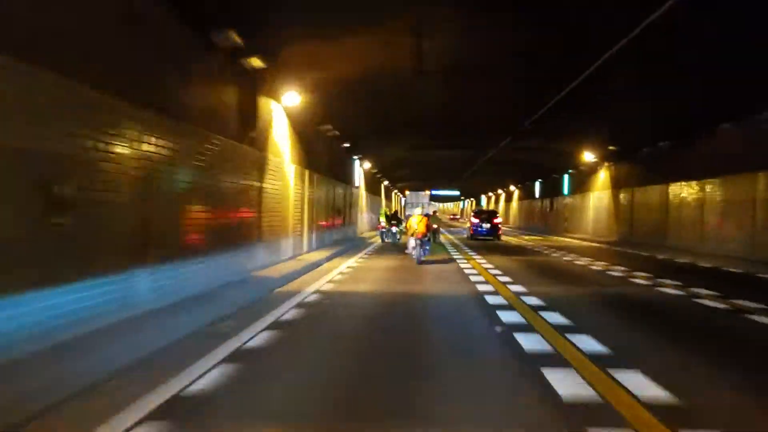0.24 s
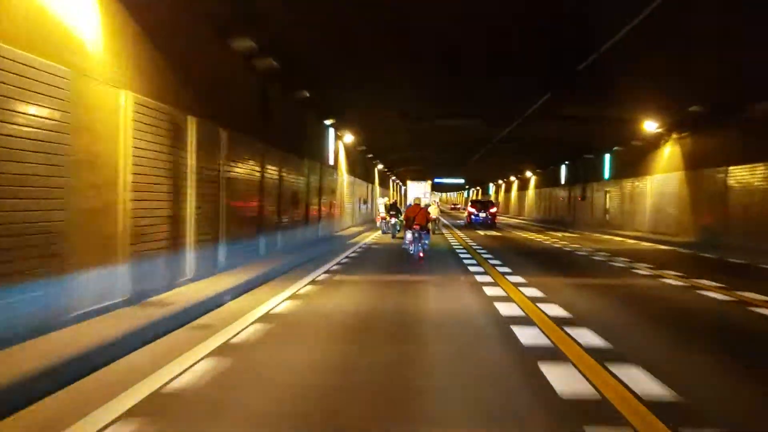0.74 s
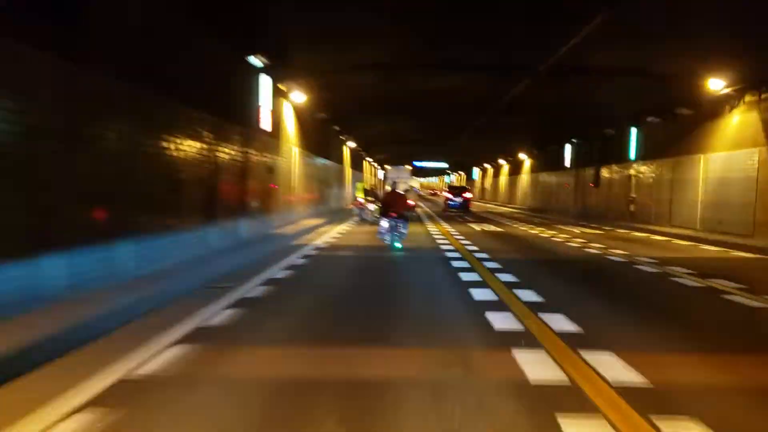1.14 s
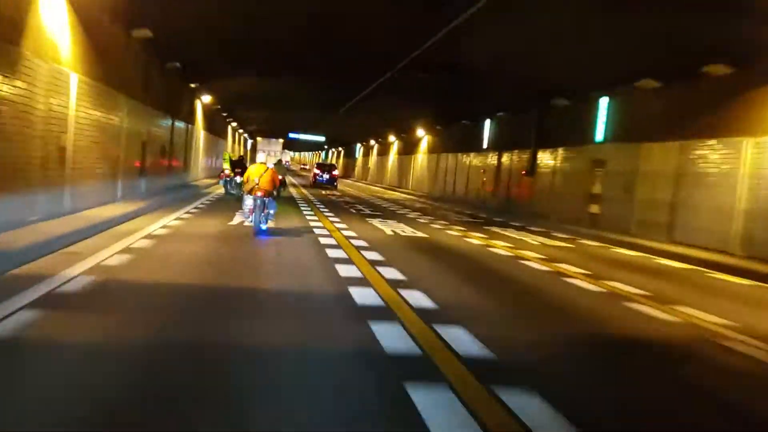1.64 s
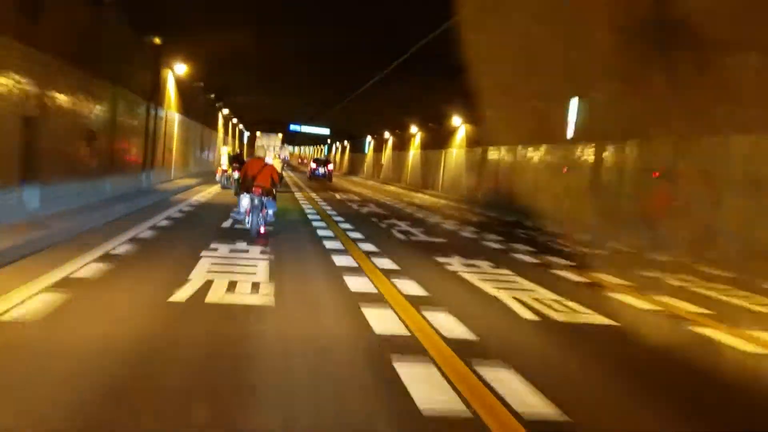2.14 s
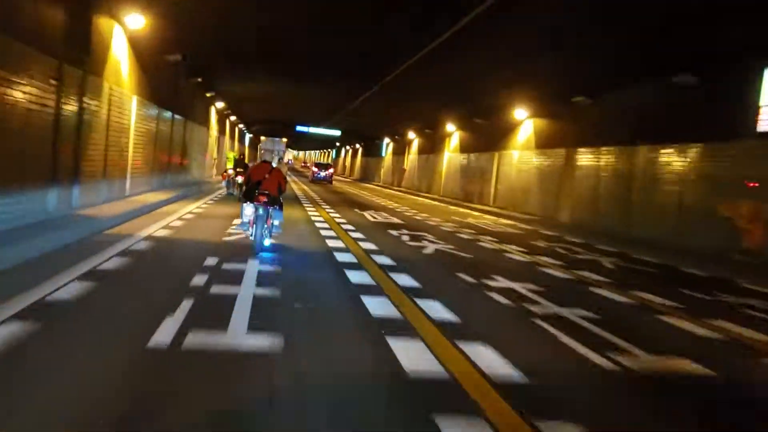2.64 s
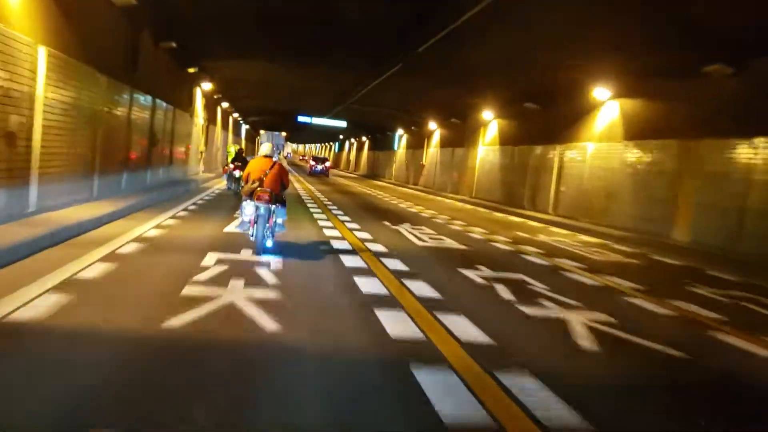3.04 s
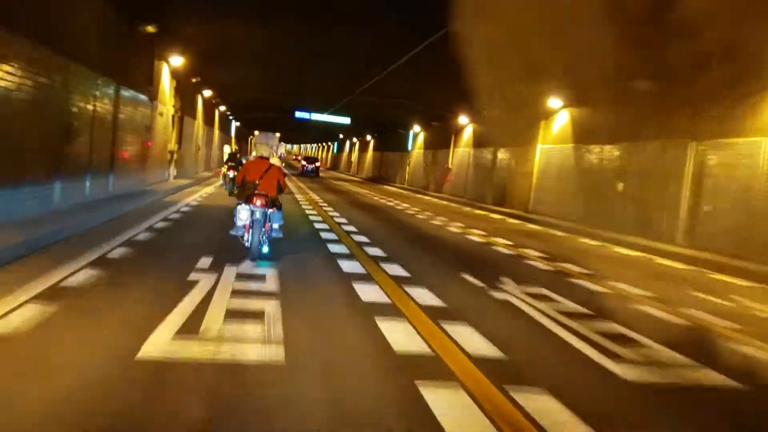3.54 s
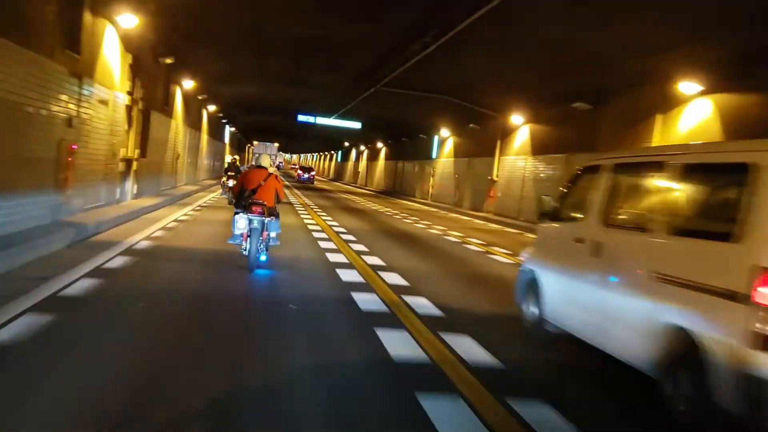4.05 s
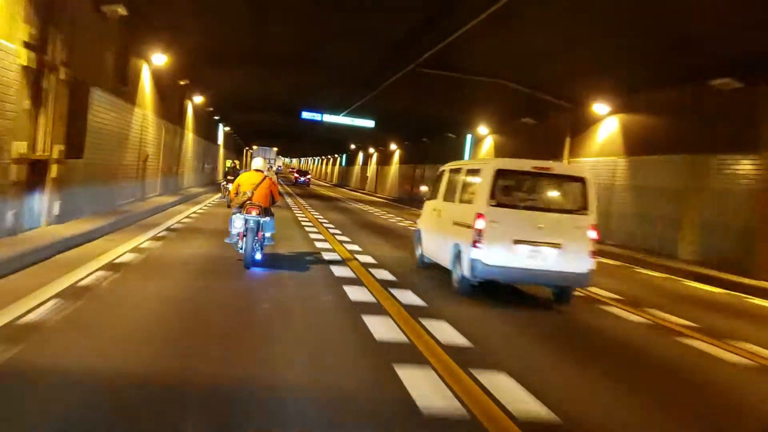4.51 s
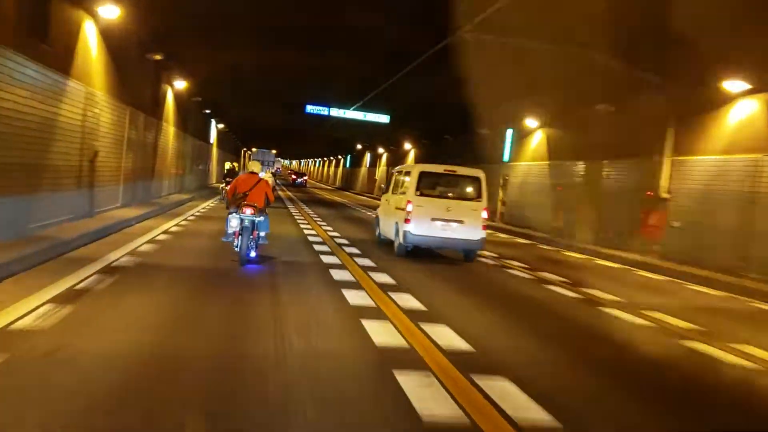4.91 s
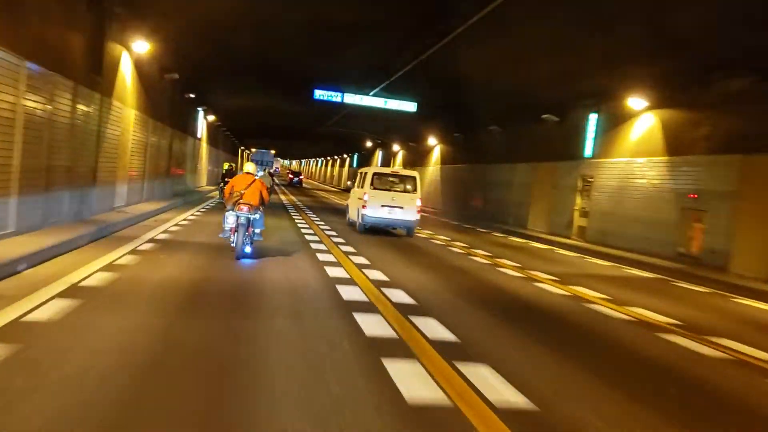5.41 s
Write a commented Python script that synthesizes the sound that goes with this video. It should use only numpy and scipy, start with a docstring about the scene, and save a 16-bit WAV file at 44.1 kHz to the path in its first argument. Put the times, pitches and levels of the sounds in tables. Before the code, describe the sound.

A microphone in a car cabin picks up bass-heavy boom, drumming tyres and a faint steady whine. Motorcycle exhausts drone from the start, come close near 1.3 seconds with a rush of noise and dry ticks, then fade by three seconds. A van draws alongside near four seconds, lower and rougher, with whine and gentle hiss, then moves ahead leaving a low drone in the tunnel.

```python
"""Car cabin in a road tunnel

Microphone inside a moving car: noise bands boom through the body, drum and roar from the tyres.
Two motorcycles drone and run close for a moment; then a van overtakes, each with a swell of hiss.
Engine notes are harmonics of a firing rate; beating and drifting tunnel echoes make them throb and waver.
Brief noise grains rustle and damped sines tick close by; the signal jumps once with a click."""
import sys
import numpy as np
from scipy.fft import rfft, irfft, next_fast_len
from scipy.io import wavfile
from scipy.ndimage import uniform_filter1d, map_coordinates

SR = 44100
rng = np.random.default_rng(int(sys.argv[2]) if len(sys.argv) > 2 else 0)


def dump_mix(stems):
    """Bounce the given channels to the path in sys.argv[1] as a 16-bit WAV at rate SR."""
    frames = np.atleast_2d(stems).T  # one column per channel
    limited = np.clip(frames, -1, 1)  # hard clip at full scale
    pcm = np.round(limited * 32767).astype(np.int16)
    wavfile.write(sys.argv[1], SR, pcm)


N = 250047
TIME = np.arange(N) / SR  # seconds


def amp(db):
    """Decibels to gain."""
    return 10 ** (np.asarray(db) / 20)


def unit(x):
    """Scaled to rms 1."""
    return x / np.sqrt(np.mean(x ** 2) + 1e-20)


def along(points, hz):
    """Values at hz, read from (frequency, value) points on a log axis."""
    point_hz, values = np.transpose(points)
    return np.interp(np.log(hz + 1), np.log(point_hz + 1), values)


def curves(rows):
    """One value per sample for each column after the time."""
    seconds, *columns = np.transpose(rows)
    return [np.interp(TIME, seconds, column) for column in columns]


def present(rows, fade):
    """1 while a table lasts, fading over some seconds outside it."""
    start, end = rows[0][0], rows[-1][0]
    return np.interp(TIME, [start - fade, start, end, end + fade], [0, 1, 1, 0])


def wobble(rate):
    """A smooth random curve, rate knots a second."""
    return map_coordinates(rng.standard_normal(512), [TIME * rate + 2], mode="wrap")


def filtered(x, response):
    """x shaped by a response of frequency, padded so that its end does not wrap round."""
    size = next_fast_len(N + 8192)
    spectrum = rfft(x, size) * response(np.fft.rfftfreq(size, 1 / SR))
    return irfft(spectrum, size)[..., :N]


def pan(db):
    """Left and right gains for a left-minus-right level in dB."""
    return amp([[db / 2], [-db / 2]])


# Likeness of the two ears in the cabin: (frequency [Hz], left-right correlation [-1 to 1])
EAR_LIKENESS = [(25, .998), (60, 0.95), (130, 0.99), (260, 0.82), (440, 0.86), (530, 0.23), (670, 0.54),
                (760, -0.7), (890, -0.56), (1200, -0.3), (1600, -0.17), (2200, 0.032), (4000, -0.011)]


def noise(spectrum):
    """Stereo noise of rms 1: alike in the bass, opposed near 800 Hz, diffuse in the treble."""
    def mid_side_response(hz):
        turn = np.arccos(np.clip(along(EAR_LIKENESS, hz), -1, 1)) / 2
        return amp(along(spectrum, hz)) * [np.cos(turn), np.sin(turn)]

    mid, side = filtered(rng.standard_normal((2, N)), mid_side_response)
    return unit(np.array([mid + side, mid - side]))


def even(x, seconds):
    """Noise whose power holds steady over spans longer than seconds."""
    size = max(int(seconds * SR / 2), 2)
    power = uniform_filter1d(uniform_filter1d(np.mean(x ** 2, axis=0), size), size)
    return x / np.sqrt(np.abs(power) + 1e-9)


def note(hz, echo, flutter, spread):
    """A tone of rms 1 with its tunnel echoes, which drift in size and phase, partly apart at each ear."""
    drift = lambda: wobble(flutter) + 1j * wobble(flutter)
    field = 1 + echo * drift() + spread * np.array([drift(), drift()])
    cycles = np.cumsum(hz) / SR + rng.random()
    return unit(np.real(field * np.exp(2j * np.pi * cycles)))


def throb(beat_hz, crest_s, depth):
    """Gain of a note beating against a Doppler-shifted echo from the tunnel walls."""
    return np.abs(1 + depth * np.exp(2j * np.pi * beat_hz * (TIME - crest_s)))


def nearness(s, approach, stay, leave):
    """0 far, 1 alongside: a vehicle draws up, stays a moment and recedes."""
    before, after = np.maximum(s - TIME, 0), np.maximum(TIME - s - stay, 0)
    return np.exp(-(before / approach) ** 2 / 2 - after / leave)


def swell(far_db, near_db, near):
    """Gain of a source heard faintly from afar and directly when near."""
    return np.hypot(amp(far_db), amp(near_db) * near)


# The road under the car: (time [s], body shake level [dB], tyre drum level [dB])
ROAD = [(0.0, -28.5, -25), (0.2, -26.5, -23.5), (0.61, -30.5, -26.5), (1.05, -23.5, -20),
        (1.26, -23.5, -24.5), (3.0, -28, -24), (3.12, -30.5, -23.5), (3.36, -23, -22.5),
        (3.97, -25.5, -22.5), (4.25, -27.5, -25.5), (4.82, -27.5, -24), (5.67, -28, -21.5)]
# Spectra of body shake, cabin air resonances, tyre drum and tyre roar:
# each (frequency [Hz], relative density [dB per Hz])
SHAKE_SPECTRUM = [(15, -32.5), (25, -10.5), (38, -6.5), (50, 0.5), (62, 6.5), (75, -3), (100, -14),
                  (200, -92.5), (600, -140)]
BOOM_SPECTRUM = [(45, -43.5), (70, -13.5), (86, 1), (105, -3.5), (120, -3), (135, 1.5), (152, -11.5),
                 (175, -4.5), (200, -10.5), (300, -52), (900, -140)]
DRUM_SPECTRUM = [(90, -33.5), (145, 2), (170, 3.5), (195, -1), (235, 2.5), (270, 4), (320, 1), (365, -6.5),
                 (430, -11.5), (800, -54), (2500, -140)]
ROAR_SPECTRUM = [(220, -51), (350, -2), (410, 1.5), (470, -3.5), (545, -0.5), (620, -13), (700, -12),
                 (820, -22.5), (1200, -35.5), (5000, -140)]
# The car's own drive train: (time [s], level [dB])
CAR_WHINE = [(0, -34), (.55, -36), (1.1, -28.5), (1.8, -27), (2.3, -38), (3.05, -30), (3.25, -37),
             (3.85, -24), (4.25, -34.5), (4.8, -36), (5.22, -26.5), (5.5, -29.5)]
BOOM_DB = -24
ROAR_FAR_DB, ROAR_NEAR_DB = -29, -31  # tyre roar alone, and what a vehicle alongside adds
WHINE_HZ, WHINE_OCTAVE_DB = 401.3, -27  # the octave's level is against the fundamental


def car(near):
    """The road shakes the body and booms in the cabin; the tyres drum, and roar louder beside vehicles."""
    shake_db, drum_db = curves(ROAD)
    shake = amp(shake_db) * even(noise(SHAKE_SPECTRUM), seconds=0.76)
    boom = amp(BOOM_DB) * even(noise(BOOM_SPECTRUM), seconds=0.18)
    drum = amp(drum_db) * even(noise(DRUM_SPECTRUM), seconds=0.17)
    roar = swell(ROAR_FAR_DB, ROAR_NEAR_DB, near) * even(noise(ROAR_SPECTRUM), seconds=0.14)
    hz = WHINE_HZ + np.zeros(N)
    whine = note(hz, echo=0.14, flutter=10, spread=0.45)
    whine = whine + amp(WHINE_OCTAVE_DB) * note(2 * hz, echo=0.23, flutter=11, spread=0.53)
    return shake + boom + bumps() + drum + roar + amp(curves(CAR_WHINE)[0]) * whine


# Engine speed before its wander: (time [s], firing rate [Hz])
BIKE_RATE = [(0, 105.5), (.4, 104.6), (.8, 104), (1.15, 105.6), (1.35, 104.4), (1.65, 105.4), (1.9, 103.6),
             (2.1, 104.2), (2.5, 99.5), (2.9, 99), (3.4, 105), (4, 104.5), (4.4, 108.5), (5.67, 108.5)]
# Firing note, before it throbs: (time [s], level [dB])
BIKE_THRUM = [(0, -16), (.07, -14.5), (.3, -17.5), (.46, -19), (.6, -39), (.8, -30), (1.05, -26.5),
              (1.22, -17), (1.36, -26.5), (1.52, -13.5), (1.7, -22), (1.88, -26.5), (2.02, -18.5),
              (2.17, -14.5), (2.4, -17.5), (2.6, -21.5), (3.05, -29), (3.38, -29.5), (3.58, -19),
              (3.9, -26.5), (4.4, -22.5), (4.9, -26), (5.67, -24.5)]
# Second harmonic: (time [s], level [dB])
BIKE_OCTAVE = [(0, -23), (.17, -21.5), (.41, -27.5), (.52, -20.5), (.75, -19.5), (1.05, -33), (1.23, -21),
               (1.5, -21.5), (1.6, -30), (1.73, -19.5), (1.85, -24.5), (2.05, -25.5), (2.3, -20.5),
               (2.6, -32), (2.9, -29)]
# Strong harmonics that beat with their wall echoes:
# (multiple of firing rate, relative level [dB], beat rate [Hz], crest time [s])
BIKE_GROWL = [(3, 1.5, 2.9, 1.65), (4, 1.5, 1.9, 1.603), (5, 0.5, 1.4, 1.3), (6, -5.5, 3.8, 1.566)]
# Upper notes; uneven cylinders add half multiples: (multiple of firing rate, relative level [dB])
BIKE_RASP = [(2.5, -5), (5.5, -17.5), (6.5, -15), (7, -17.5), (7.5, -17.5), (9, -23), (9.5, -22.5),
             (10, -19.5), (11, -27), (12.5, -22.5), (18, -22.5), (19, -28.5)]
BIKE_RASP_NEAR_DB = -29  # growl and rasp right alongside
BIKE_RASP_CARRIED_DB = -25  # growl and rasp from afar, against the firing note


def motorcycle(near):
    """Low exhaust notes carry through the tunnel and throb; growl and rasp stand out when it is close."""
    hz = curves(BIKE_RATE)[0] * (1 + 0.00596 * wobble(12))  # the engine speed wanders
    thrum_db, = curves(BIKE_THRUM)
    thrum = amp(thrum_db) * note(hz, echo=0.18, flutter=11, spread=0.1)
    thrum = thrum * throb(beat_hz=8.7, crest_s=2.96, depth=0.33)
    octave = amp(curves(BIKE_OCTAVE)[0]) * note(2 * hz, echo=0.2, flutter=16, spread=0.22)
    growl = sum(amp(db) * throb(beat_hz, crest_s, depth=0.54)
                * note(multiple * hz, echo=0.2, flutter=24, spread=0.11 * multiple)
                for multiple, db, beat_hz, crest_s in BIKE_GROWL)
    rasp = sum(amp(db) * note(multiple * hz, echo=0.48, flutter=22, spread=0.27 * multiple)
               for multiple, db in BIKE_RASP)
    upper = swell(thrum_db + BIKE_RASP_CARRIED_DB, BIKE_RASP_NEAR_DB, near) * (growl + rasp)
    return thrum + (octave + upper) * present(BIKE_OCTAVE, fade=0.14)


# Second motorcycle, rate before its wander: (time [s], firing rate [Hz], level [dB])
COMPANION = [(0, 102.5, -36), (.45, 115, -38.5), (.8, 104, -36), (1.15, 107, -39), (1.5, 111, -42),
             (1.8, 112.5, -36), (2.05, 110.5, -29.5), (2.3, 111, -38), (2.55, 100, -34)]
# Its harmonics: (multiple of firing rate, relative level [dB])
COMPANION_RASP = [(2, 6.5), (3, -4.5), (4, -5.5), (5, -4.5), (6, -13.5), (7, -16.5), (8, -20), (9, -22)]


def companion():
    """A second motorcycle, at a firing rate of its own, beats against the first."""
    hz, db = curves(COMPANION)
    hz = hz * (1 + 0.0062 * wobble(11))
    notes = sum(amp(level) * note(multiple * hz, echo=0.52, flutter=20, spread=0.023 * multiple)
                for multiple, level in COMPANION_RASP)
    return amp(db) * notes * present(COMPANION, fade=0.11)


# Distant traffic, added to the far levels below: (time [s], level [dB])
FAR_TRAFFIC = [(0, 1), (.2, 0), (.85, -1.5), (2, -0.5), (2.6, -1.5), (2.97, -3.5), (3.3, -1.5), (4.5, -2),
               (4.95, -4.5), (5.2, -3.5), (5.67, -1)]


def traffic_level(far_db, near_dbs, nears, falloff):
    """Gain of the ebbing distant traffic plus the vehicles alongside."""
    passing = sum(amp(db) * near ** falloff for db, near in zip(near_dbs, nears))
    return np.hypot(amp(far_db + curves(FAR_TRAFFIC)[0]), passing)


def cabin_modes(x, spacing_hz, depth_db):
    """Crowded cabin resonances put fixed fine ripples on the spectrum at each ear."""
    def response(hz):
        ears = rng.standard_normal((2, 1024))
        ripple = [map_coordinates(ear, [hz / spacing_hz], mode="wrap") for ear in ears]
        return amp(depth_db * np.array(ripple))

    return filtered(x, response)


# The two motorcycles, the van and last its rear wheels at their closest: (closest from time [s],
# approach [s], stay [s], leave [s], wash level [dB], rush level [dB], hiss level [dB])
PASSES = [(1.27, 0.16, 0.38, 0.36, -37, -38.5, -46), (1.959, 0.12, 0.048, 0.3, -36.5, -47.5, -61.5),
          (3.75, 0.34, 0.49, 0.23, -45, -45, -53.5), (4.3, .1, 0.078, 0.29, -44.5, -50.5, -64.5)]
# Spectra from low to high: each (frequency [Hz], relative density [dB per Hz])
WASH_SPECTRUM = [(400, -29), (700, -2), (850, 1), (1020, -5), (1200, -9.5), (1600, -21.5), (6000, -120)]
RUSH_SPECTRUM = [(700, -28), (1100, 0), (1300, 2.5), (1600, -0.5), (1900, -4.5), (2300, -8.5), (3200, -29),
                 (6000, -62), (12000, -120)]
HISS_SPECTRUM = [(1200, -22.5), (2300, -0.5), (2800, 1), (3300, -1), (4400, -5), (5500, -13), (6600, -17),
                 (7700, -13.5), (8700, -31.5), (12000, -29), (16000, -40.5)]
FAR_WASH_DB, FAR_RUSH_DB, FAR_HISS_DB = -38.5, -46.5, -56.5
WASH_FALLOFF, RUSH_FALLOFF, HISS_FALLOFF = 4.3, 1.7, 1.7  # powers of nearness
GRIT_DB, GRIT_PER_S = 1.02, 170  # coarse asphalt roughens the noise of vehicles alongside


def traffic(nears):
    """Tyre and air noise through the windows swells as each vehicle comes alongside."""
    *_, wash_dbs, rush_dbs, hiss_dbs = np.transpose(PASSES)
    wash = traffic_level(FAR_WASH_DB, wash_dbs, nears, WASH_FALLOFF) * noise(WASH_SPECTRUM)
    rush = traffic_level(FAR_RUSH_DB, rush_dbs, nears, RUSH_FALLOFF) * noise(RUSH_SPECTRUM)
    hiss = traffic_level(FAR_HISS_DB, hiss_dbs, nears, HISS_FALLOFF) * noise(HISS_SPECTRUM)
    # each band flickers at its own pace
    wash = wash * amp(1.1 * wobble(14))
    rush = rush * amp(0.78 * wobble(8.7))
    hiss = hiss * amp(0.56 * wobble(30))
    grit = amp(GRIT_DB * np.max(nears, axis=0) * wobble(GRIT_PER_S))
    return cabin_modes(wash + grit * (rush + hiss), spacing_hz=30.06, depth_db=1.5)


# Short scrapes and hisses: rubs near the microphone, and at 4.486 s a breath of van hiss:
# (time [s], Gaussian half length [s], scrape level [dB], fizz level [dB])
RUSTLES = [(0.089, 0.033, -48, -50.5), (0.183, 0.023, -68.5, -61), (0.337, 0.012, -55, -76.5),
           (0.384, 0.018, -59.5, -78), (0.445, 0.0074, -53.5, -74), (1.326, 0.053, -49.5, -60),
           (1.904, 0.04, -48.5, -74), (2.387, .03, -56, -72.5), (2.685, .018, -60, -69.5),
           (4.486, .025, -59.5, -86.5), (5.173, 0.025, -62.5, -85.5)]
# Low and high part of each: (frequency [Hz], relative density [dB per Hz])
SCRAPE_SPECTRUM = [(800, -29), (2000, 1.5), (3500, 4.5), (6000, -5.5), (7700, -6), (8800, -20.5),
                   (16000, -30)]
FIZZ_SPECTRUM = [(4000, -36), (7500, 1.5), (9500, -5.5), (12500, -0.5), (15500, -0.5)]


def rustles():
    """Short scrapes and hisses: bursts of noise made grainy by a fast random level."""
    bursts = [(np.exp(-((TIME - s) / length) ** 2 / 2), scrape_db, fizz_db)
              for s, length, scrape_db, fizz_db in RUSTLES]
    scrape = sum(burst * amp(scrape_db) for burst, scrape_db, _ in bursts) * noise(SCRAPE_SPECTRUM)
    fizz = sum(burst * amp(fizz_db) for burst, _, fizz_db in bursts) * noise(FIZZ_SPECTRUM)
    return (scrape + fizz) * amp(1.9 * wobble(260)) * pan(1.5)


# Loose trim in the cabin: (time [s], knock level [dB], knock pitch [Hz], knock t60 [s],
# crack level [dB], left minus right [dB])
TICKS = [(0.244, -48, 7500, .007, -56, -5), (1.273, -51, 5970, 0.0037, -48, 0),
         (1.298, -45, 6000, .004, -48, 2), (1.3374, -42.5, 11740, 0.0058, -41.5, 0),
         (1.3735, -18.5, 2620, 0.003, -42, -3.5), (1.381, -17.5, 1300, .005, -42, -4.5),
         (1.837, -34, 5440, 0.0025, -34.5, 8), (2.139, -59, 11760, .006, -59, -1)]
# The crack: (frequency [Hz], relative density [dB per Hz])
CRACK_SPECTRUM = [(2000, -13.5), (4800, 2.5), (7500, 3), (8700, -13), (10400, -4.5), (12700, 0.5),
                  (14500, -6.5), (15800, -6.5)]
TICK_ATTACK_S, CRACK_T60_S = 0.00005, 0.0053


def ticks():
    """Loose trim ticks: a heavily damped knock at the part's own pitch under a short, bright crack."""
    out, t = np.zeros((2, N)), np.arange(2048) / SR
    fall = lambda t60: amp(-60 * t / t60) * (1 - np.exp(-t / TICK_ATTACK_S))
    crack_response = amp(along(CRACK_SPECTRUM, np.fft.rfftfreq(len(t), 1 / SR)))
    for s, knock_db, knock_hz, t60, crack_db, lean_db in TICKS:
        knock = np.sqrt(2) * np.sin(2 * np.pi * knock_hz * t) * fall(t60)
        grain = irfft(rfft(rng.standard_normal(len(t))) * crack_response)
        crack = unit(grain) * fall(CRACK_T60_S)
        tick = amp(knock_db) * knock + amp(crack_db) * crack
        out[:, round(s * SR):][:, :len(t)] += tick * pan(lean_db)
    return out


# Engine speed before its wander: (time [s], firing rate [Hz])
VAN_RATE = [(2.4, 88), (2.9, 88), (3.35, 83), (3.7, 85.4), (3.95, 85), (4.3, 86.8), (4.7, 85.8),
            (5.2, 83.6), (5.67, 83.5)]
# Firing note, before it throbs: (time [s], level [dB])
VAN_DRONE = [(2.3, -32), (2.9, -24.5), (3.42, -22.5), (3.62, -29), (4, -35.5), (4.2, -33), (4.65, -28.5),
             (4.92, -34.5), (5.2, -25.5), (5.4, -21), (5.67, -14.5)]
# Exhaust rasp, loudest about when the van draws level: (time [s], level [dB])
VAN_RASP_LEVEL = [(2.9, -47), (3.4, -34), (3.8, -30), (4.05, -33.5), (4.35, -32), (4.6, -40), (5.67, -37)]
# Exhaust harmonics, then upper ones heard only from close by:
# each (multiple of firing rate, relative level [dB])
VAN_RASP = [(2, -4), (3, 0.5), (5, 3)]
VAN_EDGE = [(6, -7.5), (7, -4), (8, -18.5)]
# Gear whine: (time [s], pitch [Hz], level [dB])
VAN_WHINE = [(3.3, 309.8, -30.5), (3.8, 314.8, -25.5), (4.1, 323, -38.5), (4.28, 328, -20), (4.5, 331, -28),
             (4.85, 328.6, -30), (5.2, 329.6, -41)]
# Tyre tread singing, falling in pitch as it goes by: (time [s], pitch [Hz], level [dB])
VAN_TREAD = [(4.24, 806, -54), (4.33, 800, -47.5), (4.44, 745, -45), (4.52, 712, -52)]
VAN_OCTAVE_DB = -9.5  # second harmonic against the firing note
VAN_EDGE_FALLOFF = 0.74  # extra dB the edge loses for each dB that the exhaust fades


def van():
    """A lower, gently throbbing engine, gear whine and tyre tone pass; rasp brightens as it draws up."""
    hz = curves(VAN_RATE)[0] * (1 + .005 * wobble(11))
    drone = note(hz, echo=1.0, flutter=16, spread=0.033)
    drone = drone * throb(beat_hz=4.3, crest_s=3.1, depth=0.12)
    octave = amp(VAN_OCTAVE_DB) * note(2 * hz, echo=0.3, flutter=8.5, spread=0.12)

    def harmonics(rows):
        return sum(amp(db) * note(multiple * hz, echo=0.38, flutter=18, spread=0.062 * multiple)
                   for multiple, db in rows)

    rasp_db, = curves(VAN_RASP_LEVEL)
    edge = amp(VAN_EDGE_FALLOFF * (rasp_db - rasp_db.max())) * harmonics(VAN_EDGE)
    rasp = amp(rasp_db) * (harmonics(VAN_RASP) + edge)
    engine = amp(curves(VAN_DRONE)[0]) * (drone + octave) + rasp
    whine_hz, whine_db = curves(VAN_WHINE)
    whine = amp(whine_db) * note(whine_hz, echo=0.31, flutter=20, spread=0.12)
    tread_hz, tread_db = curves(VAN_TREAD)
    tread = amp(tread_db) * note(tread_hz, echo=1.3, flutter=45, spread=0.9)
    passing = engine * present(VAN_DRONE, fade=0.37) + whine * present(VAN_WHINE, fade=0.14)
    return passing + tread * present(VAN_TREAD, fade=0.066)


# Unevenness in the road: (time [s], level [dB])
BUMPS = [(2.581, -13), (2.84, -15), (2.93, -17), (3.2, -14), (3.39, -19), (3.999, -13), (4.38, -17),
         (4.55, -19), (4.7, -14)]
BUMP_HZ, BUMP_S = 91.4, .025  # the cabin's lowest boom; Gaussian half length of one bump


def bumps():
    """Each bump in the road swells the cabin's lowest boom for a few cycles."""
    push = sum(amp(db) * np.exp(-((TIME - s) / BUMP_S) ** 2 / 2) for s, db in BUMPS)
    boom = note(BUMP_HZ + np.zeros(N), echo=0.77, flutter=25, spread=.04)
    return push * even(boom, seconds=0.035)


# A click where the signal jumps: (time [s], level [dB])
JUMP = [(4.3943, -12)]


def click(relax):
    """A click where the signal jumps: a sudden step that relaxes at once."""
    return sum(-amp(db) * (TIME >= s) * np.exp(-np.abs(TIME - s) / relax) for s, db in JUMP)


# Balance at the microphone: (frequency [Hz], left minus right [dB])
CABIN_LEAN = [(25, -3), (60, -2), (300, -2), (520, -2.5), (700, 1.2), (950, -2), (2300, -2.5), (3300, -0.5),
              (4400, 2.5), (5700, 9), (7000, 3), (8000, 4.5), (9500, 2)]


def scene():
    """In the cabin most of the low sound leans to the right and the hiss to the left."""
    nears = [nearness(s, approach, stay, leave) for s, approach, stay, leave, *_ in PASSES]
    own_car = car(np.max(nears, axis=0))
    outside = own_car + motorcycle(nears[0]) + companion() + traffic(nears) + van()
    cabin = filtered(outside, lambda hz: amp(np.outer([1, -1], along(CABIN_LEAN, hz)) / 2))
    return cabin + rustles() + ticks() + click(relax=0.00045) * pan(1.2)


TOP_HZ = 15830


def record(dry):
    """The microphone signal fades in over 3 ms and keeps nothing above its band limit."""
    opening = np.minimum(TIME / .003, 1)
    return filtered(dry * opening, lambda hz: hz < TOP_HZ)


dry = scene()
out = record(dry)
dump_mix(out)
```